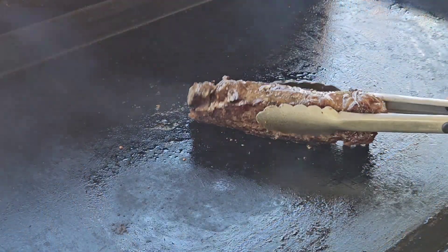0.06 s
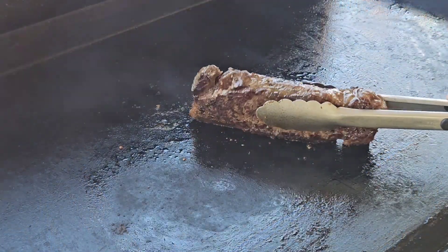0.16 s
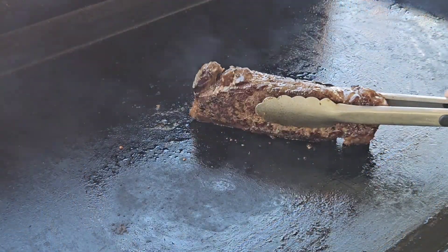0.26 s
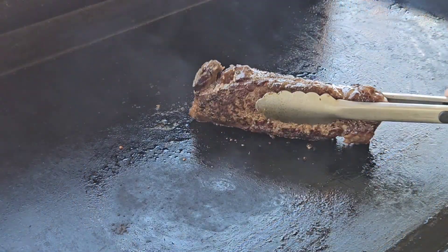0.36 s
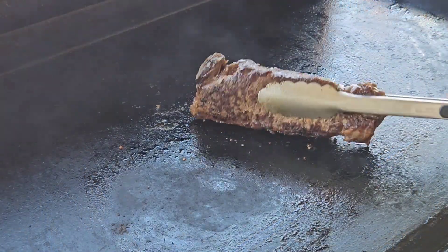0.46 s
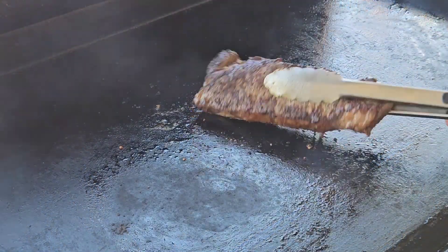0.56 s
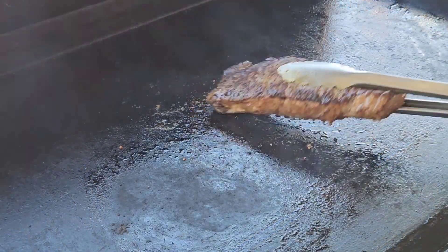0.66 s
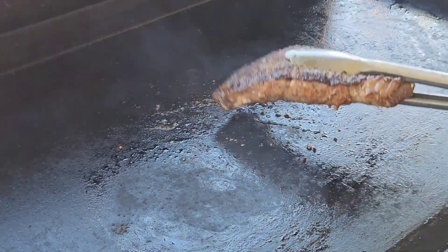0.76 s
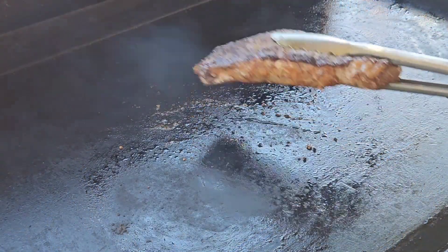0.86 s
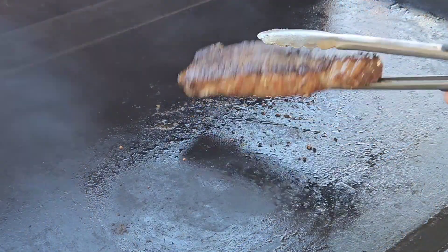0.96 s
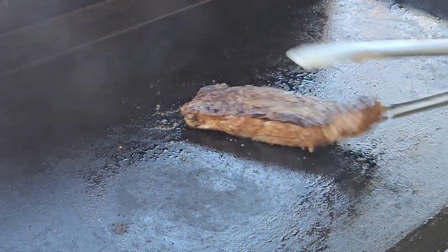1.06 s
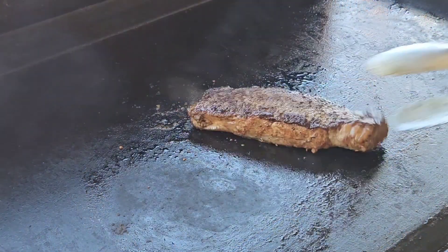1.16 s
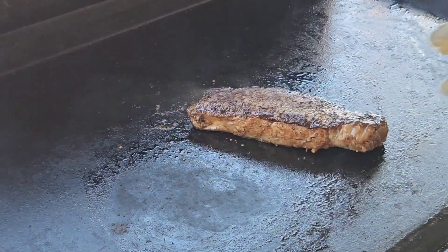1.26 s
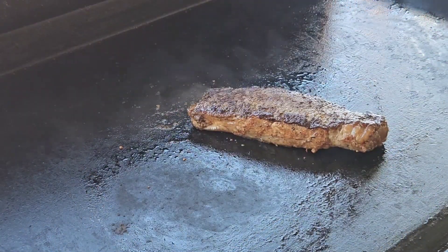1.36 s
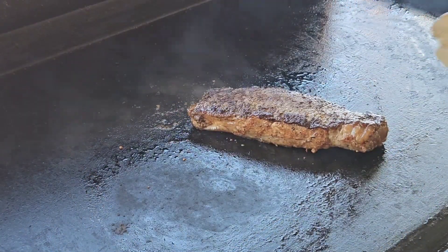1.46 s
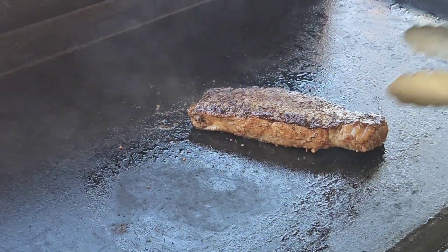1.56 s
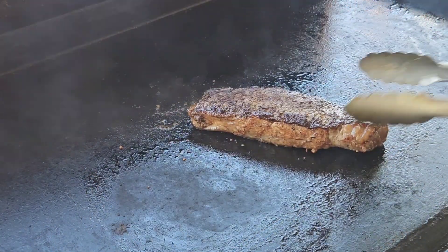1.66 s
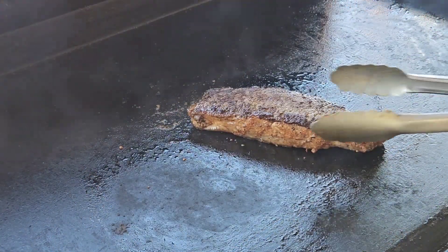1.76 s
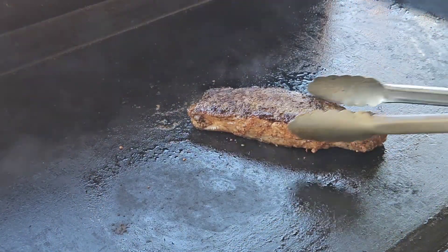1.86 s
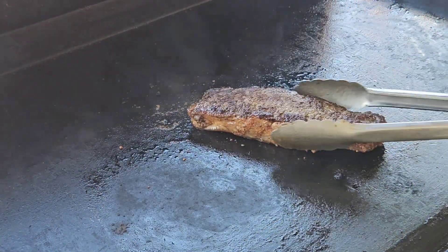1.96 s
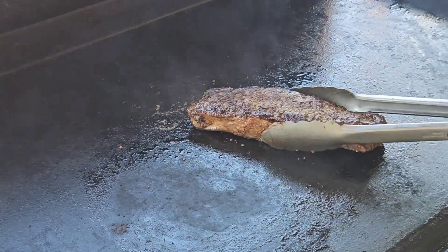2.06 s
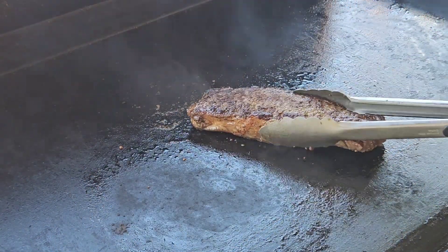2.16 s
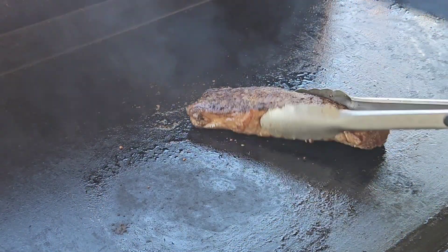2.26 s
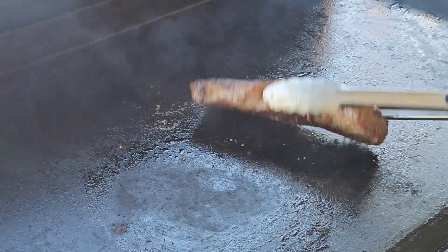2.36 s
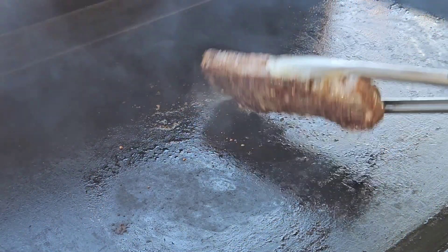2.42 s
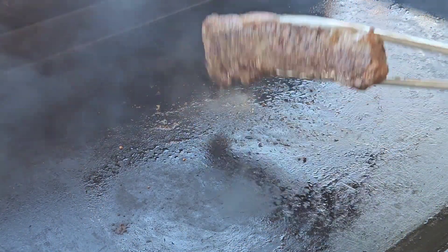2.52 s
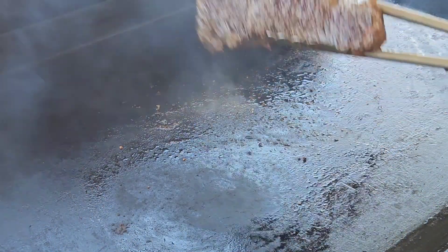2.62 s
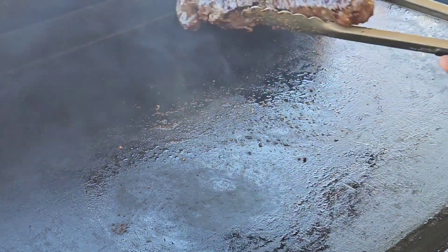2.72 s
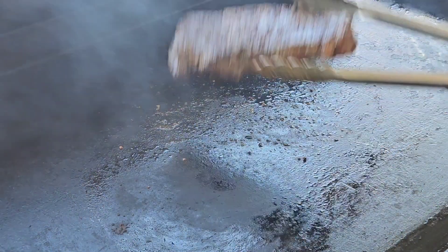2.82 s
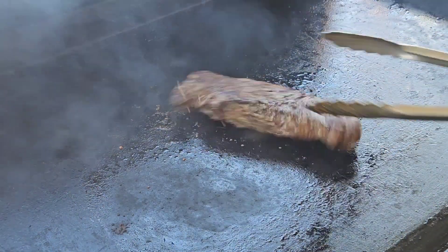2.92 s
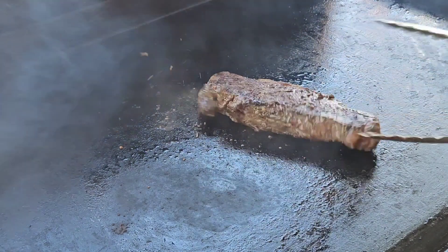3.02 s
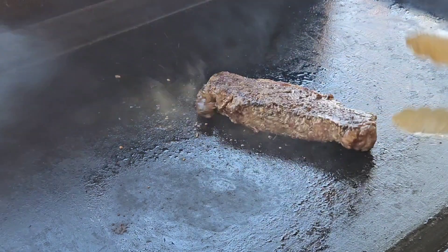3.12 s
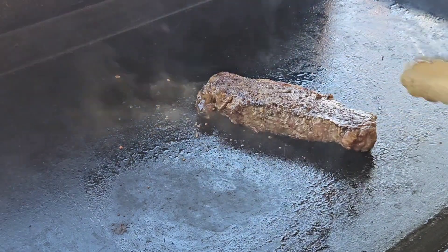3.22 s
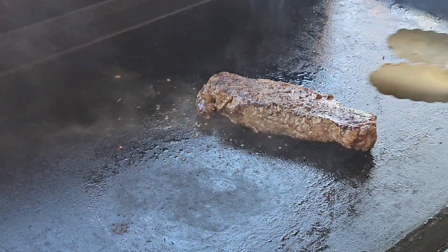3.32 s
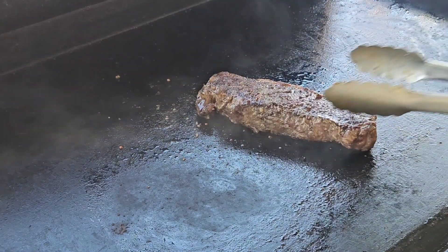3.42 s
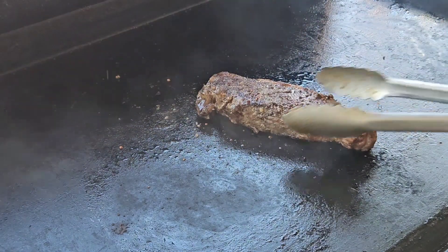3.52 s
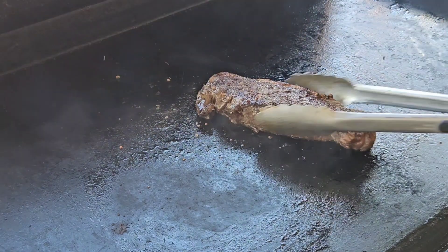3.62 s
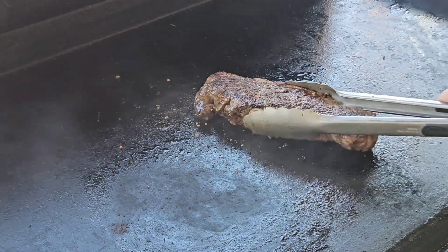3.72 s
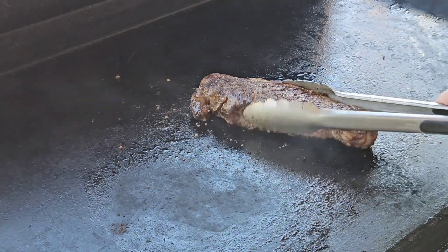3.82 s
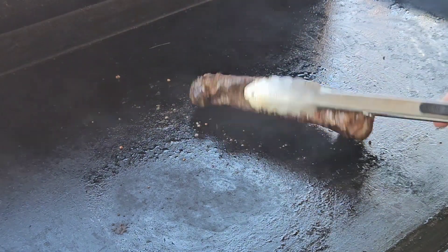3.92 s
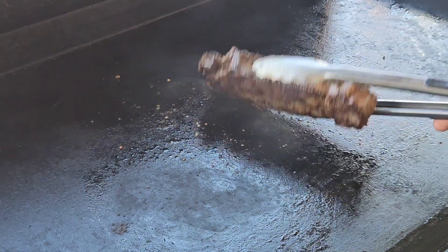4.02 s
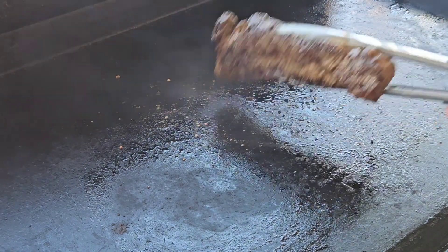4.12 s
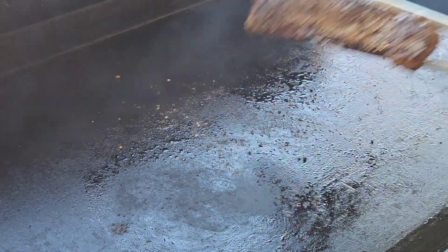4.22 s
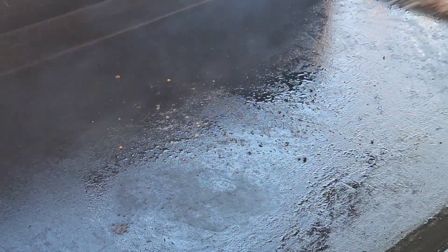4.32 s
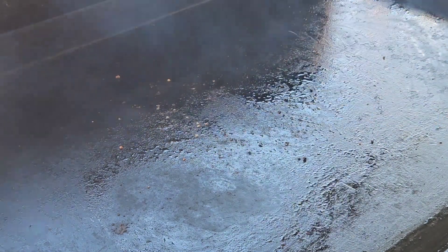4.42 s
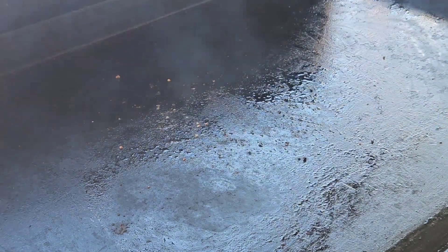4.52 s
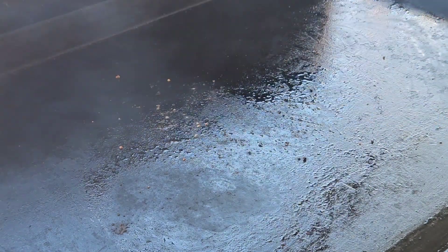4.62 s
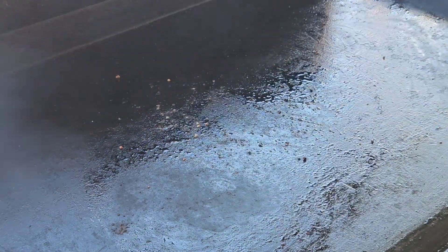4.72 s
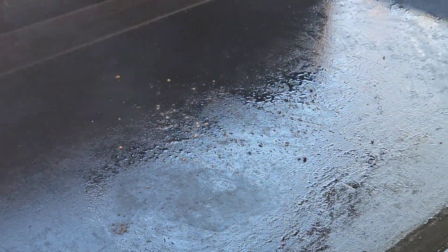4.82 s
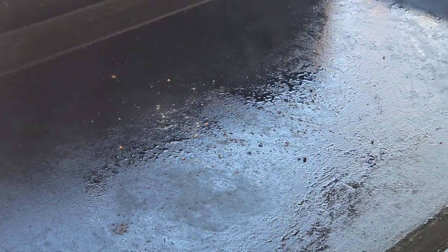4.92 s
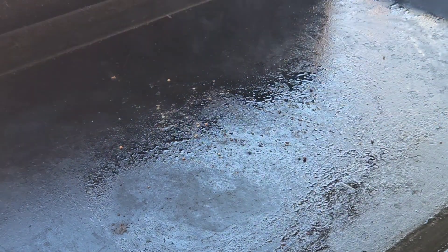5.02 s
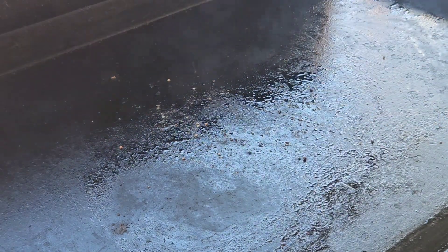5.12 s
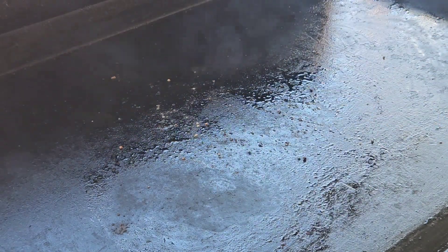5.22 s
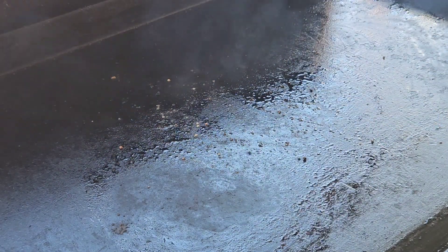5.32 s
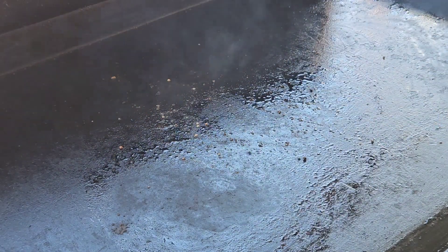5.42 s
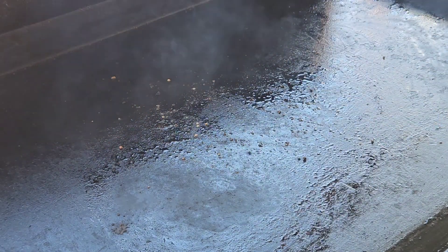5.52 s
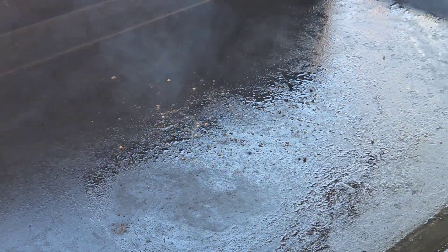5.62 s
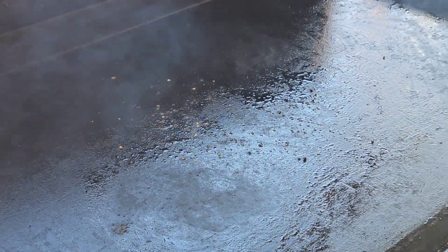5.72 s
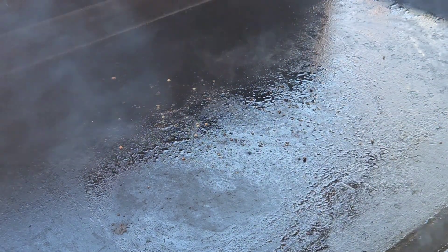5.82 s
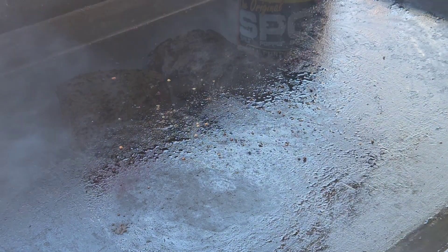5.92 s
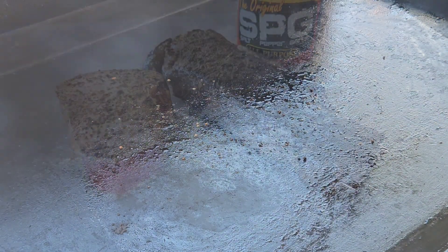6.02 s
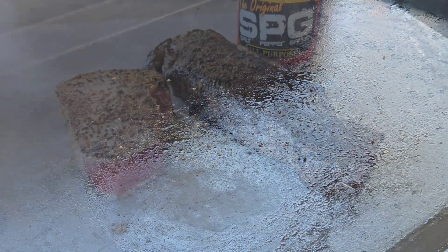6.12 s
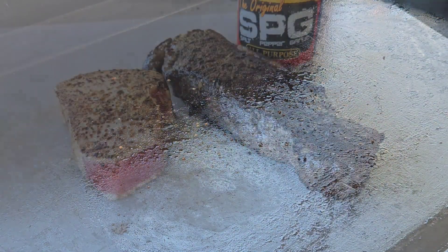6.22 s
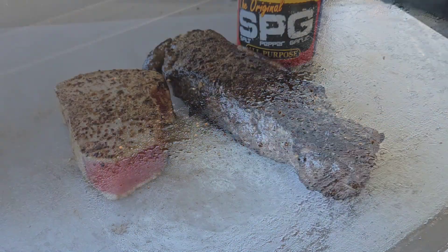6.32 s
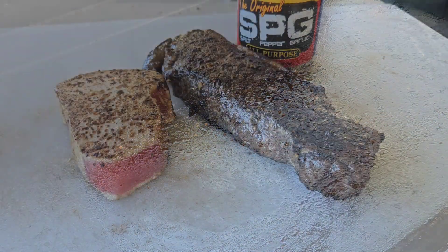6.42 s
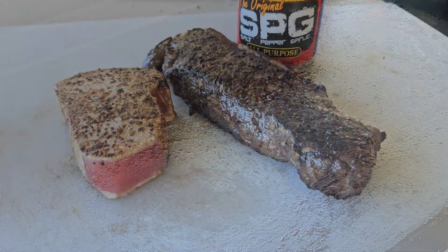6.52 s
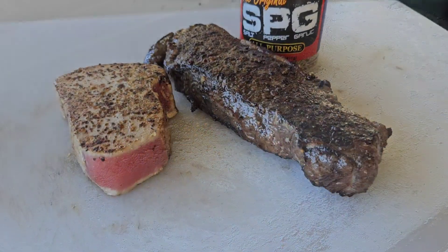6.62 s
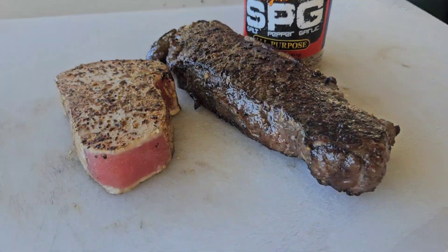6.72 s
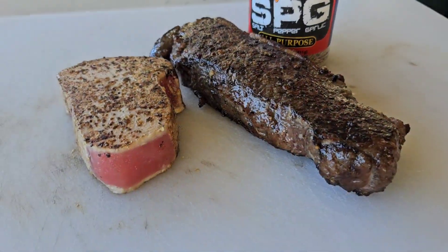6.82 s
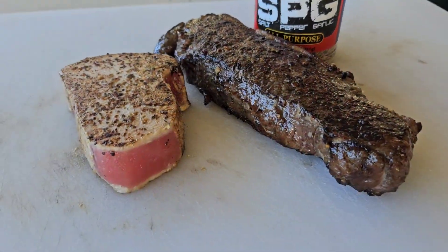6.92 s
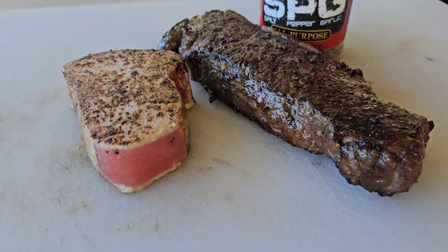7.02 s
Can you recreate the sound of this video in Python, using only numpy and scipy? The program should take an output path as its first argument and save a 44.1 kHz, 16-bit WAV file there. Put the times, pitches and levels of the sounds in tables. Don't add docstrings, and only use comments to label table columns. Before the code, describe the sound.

Outdoors, close stereo pickup of a hot griddle. From 0 to 0.6 seconds thin, bright fat sizzle carries a cluster of sharp pops, over a steady low engine drone in the distance. The sizzle dips near 0.8 with a dull tick, then a soft thud at 1.15 brings a strong rush of frying and a loud snap at 1.3. Tongs strike the steel in a quick ringing double clank at 2.1. Sizzle surges, drops around 2.5, then a lighter clank at 2.95 leads to the fiercest hiss near 3.2 with a very loud pop. More bursts and snaps follow until 4.4. The bare fat then fades to sparse spitting while the hum and a faint whine remain. At 6.41 everything stops for under a tenth of a second; then quiet air, a faint rustle at 6.75, and lumpy low wind from 6.8 to the end.

```python
import sys
import numpy as np
from scipy import signal
from scipy.fft import irfft, next_fast_len
from scipy.io import wavfile
from scipy.ndimage import uniform_filter1d

SR = 44100
rng = np.random.default_rng(int(sys.argv[2]) if len(sys.argv) > 2 else 0)


def unload_audio(sound):
    columns = np.transpose(np.atleast_2d(sound))
    steps = np.round(np.clip(columns, -1, 1) * 32767)
    wavfile.write(sys.argv[1], SR, steps.astype(np.int16))


def volts_from_db(level):
    exponent = np.asarray(level, float) / 20
    return 10 ** exponent


N = 311598
GRIDDLE_END_S, TABLE_START_S = 6.411, 6.4865
FILM_SIZE_DB = -5
LEFT_RIGHT = np.array([[1], [-1]])


def evened(x):
    return x / np.sqrt(np.mean(x ** 2) + 1e-20)


def read(points, hz):
    f, value = np.transpose(points)
    return np.interp(np.log(hz + 1), np.log(f + 1), value)


def curves(rows, t):
    s, *columns = np.transpose(rows)
    return [np.interp(t, s, c) for c in columns]


def drift(per_s):
    low_pass = signal.butter(2, per_s, fs=SR, output="sos")
    wander = signal.sosfilt(low_pass, rng.standard_normal(N + SR))
    return evened(wander[SR:])


def shaped(x, field_db, size):
    hz, t, z = signal.stft(x, SR, nperseg=size, noverlap=size * 3 // 4)
    z = z * volts_from_db(field_db(hz[:, None], t))
    return signal.istft(z, SR, nperseg=size, noverlap=size * 3 // 4)[1][..., :N]


def port_noise():
    # (frequency [Hz], likeness [-1 to 1])
    likeness = [(30, 0.75), (150, 0.73), (380, 0.68), (950, 0.31), (2380, 0.79), (5980, 0.28),
                (15000, -0.12)]
    # (frequency [Hz], left over right [dB])
    balance = [(60, -1.5), (180, 1.5), (550, -0.5), (1650, -0.5), (4970, 0.5), (15000, -1.5)]
    size = next_fast_len(N)
    hz = np.fft.rfftfreq(size, 1 / SR)
    a, b, c, d = rng.standard_normal((len(hz), 4)).T * np.sqrt(size / 2)
    same = np.clip(read(likeness, hz), 0, 1)
    lean = volts_from_db(read(balance, hz) / 2)
    left = a + 1j * b
    right = same * left + np.sqrt(1 - same ** 2) * (c + 1j * d)
    return irfft([left * lean, right / lean], size)[:, :N]


def engine():
    # (time [s], firing rate [Hz], second overtone level [dB], sixth overtone level [dB])
    running = [(0, 36.0, -34, -43), (2.6, 36.1, -34.5, -45), (4.4, 36.2, -34, -48), (5.3, 36.3, -33.5, -51),
               (6.41, 36.6, -33.5, -53)]
    # (multiple of firing rate [1], level [dB])
    exhaust = [(1, -14), (2, 0), (3, -8), (4, -16.5), (5, -1), (6, -3.5), (7, -18), (8, -17), (9, -22.5)]
    # (time [s], pitch [Hz], level [dB])
    whine = [(0, 415, -67), (4.1, 418, -65), (4.45, 423.5, -53), (6, 424, -53.5), (6.41, 424, -56)]
    # (frequency [Hz], level [dB per Hz])
    yard_colour = [(15, -36.5), (24, -8), (36, -2), (50, -7), (75, -10), (150, -9.5), (200, -18.5),
                   (300, -22.5), (420, -22.5), (635, -27.5), (1240, -30.5), (2870, -37.5), (4000, -53.5),
                   (5200, -64)]
    t = np.arange(N) / SR
    hz, low_db, high_db = curves(running, t)
    turns = np.cumsum(hz * (1 + .008 * drift(12))) / SR
    bright_db = high_db - low_db - exhaust[5][1]
    out = np.zeros(N)
    for k, db in exhaust:
        waver_db = (.3 + .3 * k) * drift(12)
        lag = 0.85 * k + .12 * k ** 2
        level_db = db + low_db + bright_db * np.clip((k - 3) / 3, 0, 1) + waver_db
        out -= volts_from_db(level_db) * np.cos(2 * np.pi * k * turns - lag)
    whine_hz, whine_db = curves(whine, t)
    whine_level = volts_from_db(whine_db + 0.63 * drift(15.0))
    whine_turns = np.cumsum(whine_hz * (1 + 0.0022 * drift(13.0))) / SR
    out += whine_level * np.sin(2 * np.pi * whine_turns)
    throb = 1 + 0.12 * np.cos(2 * np.pi * turns)
    roar = shaped(port_noise(), lambda f, s: read(yard_colour, f) + 0 * s, size=2048)
    hum = np.sqrt(2) * out * volts_from_db(0.1 * LEFT_RIGHT)
    return hum + volts_from_db(-31.5 - 5.5) * throb * evened(roar)


def table(t):
    # (frequency [Hz], level [dB per Hz])
    air_colour = [(24, -18), (40, -1), (254, -6.5), (498, -20.5), (593, -19.5), (1080, -20), (1530, -24),
                  (2070, -21.5), (3000, -33), (4150, -34), (8360, -44), (9470, -53), (15600, -47.5)]
    # (time [s], level [dB], decay [s])
    rustles = [
        (6.757, -60, 0.028),
        (7.055, -67, .02),
    ]
    # (time [s], level [dB], left over right [dB])
    breeze = [(6.49, -60, -12), (6.54, -63, 6), (6.7, -70.5, 6), (6.82, -49, 1), (6.854, -47, 1),
              (6.88, -56, 4), (6.9, -46, 6), (7.01, -46.5, 6), (7.06, -46, 5)]
    # (frequency [Hz], level [dB per Hz])
    gust = [(12, -18), (20, 2), (134, -11.5), (258, -22.5), (296, -41.5), (331, -21), (400, -58),
            (520, -76), (880, -120)]
    air = shaped(port_noise()[:, :len(t)], lambda f, s: read(air_colour, f) + 0 * s, size=1024)
    air = evened(air[:, :len(t)])
    brush = sum(volts_from_db(db) * (t > s) * np.exp(-abs(t - s) / decay) for s, db, decay in rustles)
    db, pan_db = curves(breeze, t)
    eddies = rng.standard_normal((2, len(t))) + 2.4 * rng.standard_normal(len(t))
    wind = evened(shaped(eddies, lambda f, s: read(gust, f) + 0 * s, size=4096)[:, :len(t)])
    wind = wind * volts_from_db(db + 8.5 + pan_db / 2 * LEFT_RIGHT + 1.95 * drift(30.5)[:len(t)])
    return volts_from_db(-49) * air + brush * rng.standard_normal((2, len(t))) + wind


def knocks():
    # (time [s], peak [dB], ring time factor [1], rattle [s], hardness [dB per octave])
    blows_on_steel = [
        (0.841, -30, 0.3, .008, 4),
        (1.149, -25, 1, 0.031, -24),
        (1.977, -45, 0.94, 0.0082, 16.5),
        (2.124, -14, 0.65, 0.0088, 0.5),
        (2.142, -18.5, 0.47, 0.0079, -2),
        (2.955, -28.5, 0.63, .012, 1.5),
    ]
    # (frequency [Hz], level [dB], time to fall 60 dB [s])
    steel = [(611, -8, 0.33), (699, -0.5, 0.14), (820, 0.5, 0.13), (842, -3.5, .08), (1093, -2, 0.12),
             (1214, -3.5, 0.047), (1327, -3.5, 0.12), (1519, -2.5, 0.17), (1640, -1.5, .12),
             (1741, -5, 0.041), (1902, -5, 0.12), (2470, -11, 0.12)]
    out, t = np.zeros(N + SR), np.arange(SR // 3) / SR
    chance = rng.standard_normal((len(blows_on_steel), 2, len(t)))
    clack = signal.butter(4, [660, 2600], "band", fs=SR, output="sos")
    for (s, db, ring, rattle, hard_db), (blows, yard) in zip(blows_on_steel, chance):
        modes = np.zeros(len(t))
        for hz, mode_db, t60 in steel:
            fall_db = 60 * t / (t60 * max(ring, .1))
            modes += volts_from_db(mode_db + hard_db * np.log2(hz / 1000) - fall_db) * np.sin(2 * np.pi * hz * t)
        drive = blows ** 2 * np.sign(blows) * np.exp(-t / max(rattle, .001))
        drive += 0.42 * yard * np.exp(-t / 0.085)
        drive[0] += 7.0
        ringing = evened(signal.fftconvolve(drive, modes)[:len(t)])
        sound = ringing + volts_from_db(hard_db - 7.0) * evened(signal.sosfilt(clack, drive))
        out[round(s * SR):][:len(t)] += volts_from_db(db) * sound / abs(sound).max()
    thin = signal.sosfilt(signal.butter(8, 585, "high", fs=SR, output="sos"), out[:N])
    return thin * volts_from_db(0.3 * LEFT_RIGHT)


def heat(t):
    # (time [s], level [dB])
    film_curve = [(0, -30), (.5, -28.5), (.76, -31), (1.1, -32.5), (2.56, -24.5), (2.66, -22),
                  (2.94, -25.5), (3.5, -26), (3.76, -30.5), (4.2, -24.5), (4.62, -33.5), (5.1, -33.5),
                  (5.5, -35.5), (6.41, -39)]
    # (start [s], rise [s], hold [s], level [dB], bubble size [dB])
    presses = [(.55, .05, 0.016, -27, -4.5), (0.826, 0.012, 0.018, -34, -6),
               (1.114, .045, 0.055, -23.5, -1), (1.21, 0.095, 1, -20, -2), (1.834, 0.083, 0.073, -22, -2.5),
               (2.128, 0.17, 0.18, -21.5, 1), (2.297, .15, 0.027, -19, -5), (2.954, 0.055, 0.11, -21.5, 3),
               (3.064, 0.13, 0.075, -16, -1.5), (3.278, 0.028, .1, -24.5, 2), (3.47, .03, 0.031, -33.5, 8),
               (3.564, .04, 0.095, -23.5, -4), (3.766, 0.062, .04, -25.5, 1.5),
               (3.87, 0.051, 0.066, -22.5, 1.5), (3.965, 0.043, .06, -27.5, 6),
               (4.16, 0.0071, 0.015, -26.5, -3), (4.382, 0.0068, 0.011, -30.5, 1),
               (6.387, .003, .03, -40, 3)]
    sag_db_per_s, release_db_per_s, fresh_s = 7, 82, .15
    start, rise, hold, db, size_db = np.transpose(presses)[:, :, None]
    held = t - start - rise
    fall_db = sag_db_per_s * np.clip(held, 0, hold) + release_db_per_s * np.maximum(held - hold, 0)
    press = (np.clip((t - start) / rise, 0, 1) * volts_from_db(db - fall_db)) ** 2
    film = volts_from_db(curves(film_curve, t)[0]) ** 2
    total = film + press.sum(0)
    fresh = np.exp(-abs(held) / fresh_s) * np.clip((size_db + 1.0) / 4.5, 0, 1)
    mean_size_db = (film * FILM_SIZE_DB + (press * size_db).sum(0)) / total
    return 10 * np.log10(total), mean_size_db, (press * fresh).sum(0) / total


def pops():
    # (time [s], peak [dB], low part over peak [dB], length [ms])
    loud_pops = [(0.0144, -14, -14, 0.55), (0.1002, -9, -15, 0.55), (0.1226, -9, -21, 0.55),
                 (0.1999, -13, -13, 0.55), (0.2264, -9, -21, 0.55), (0.2803, -9, -18, 0.55),
                 (0.3646, -10, -24, 0.55), (0.4813, -11, -17, 0.55), (0.4918, -10, -16, 0.55),
                 (0.5571, -10, -19, 0.55), (0.5866, -9, -19, 0.55), (0.842, -16, -13, 0.55),
                 (0.8584, -16, -11, 0.55), (0.8749, -13, -16, 0.55), (0.9542, -14, -13, 0.55),
                 (0.9772, -13, -18, 0.55), (1.043, -15, -16, 0.55), (1.3064, -4, -14, 0.55),
                 (2.4384, -2, -18, 0.55), (3.2574, -1, -17, 0.55), (3.6646, -2, -15, 0.55),
                 (4.0347, -2, -15, 0.55), (4.3146, -7, -19, 0.55), (4.7027, -17, -14, 0.55),
                 (4.9003, -12, -23, 0.55), (5.4595, -17, -17, 0.55), (5.7329, -17, -21, 0.55),
                 (6.1165, -16, -15, 0.55), (6.3589, -23, -17, 0.55), (6.3879, -21, -14, 0.55)]
    stray_count, stray_over_db, stray_spread_db = 75, 12.5, -1.5
    out, t = np.zeros((2, N + SR)), np.arange(900) / SR
    when = GRIDDLE_END_S * rng.random(stray_count)
    luck = rng.standard_normal((stray_count, 2))
    stray_db = heat(when)[0] + stray_over_db + stray_spread_db * luck[:, 0]
    strays = np.transpose([when, stray_db, -17 + 1.8 * luck[:, 1], .3 + 0 * when])
    rows = np.vstack([loud_pops, strays])
    u = t / (np.maximum(rows[:, 3:], .1) / 1000)
    shape = u * np.exp(1 - u) + .06 * np.exp(-t / .004)
    noise = rng.standard_normal((len(rows), 3, len(t))) * shape[:, None]
    noise[:, :, 6] += 3.0
    shared, own = noise[:, :1], noise[:, 1:]
    low_band = signal.butter(2, [3000, 8600], "band", fs=SR, output="sos")
    high_band = signal.butter(2, [10800, 15400], "band", fs=SR, output="sos")
    low = signal.sosfilt(low_band, 1.5 * shared + own)
    high = signal.sosfilt(high_band, 0.17 * shared + own)
    low, high = (part / abs(part.mean(1)).max(1)[:, None, None] for part in (low, high))
    pans_db = -1.3 + 0.94 * rng.standard_normal(len(rows))
    for (s, db, low_db, _), pan_db, body, top in zip(rows, pans_db, low, high):
        side = volts_from_db(db + pan_db / 2 * LEFT_RIGHT)
        at = round((s + .0009) * SR)
        out[:, at:at + len(t)] += side * (volts_from_db(low_db + 14.5) * body + volts_from_db(1.5) * top)
    return out[:, :N]


def bursts(per_s, spread_db, ms):
    busy = per_s / SR * volts_from_db(3.2 * drift(25))
    size = volts_from_db(spread_db * np.minimum(rng.exponential(1, N), 4)) * (rng.random(N) < busy)
    side = volts_from_db(3.0 * rng.standard_normal(N) * LEFT_RIGHT)
    u = np.arange(300) / (ms * SR / 1000)
    pulse = u * np.exp(-u)
    power = signal.oaconvolve((size * side) ** 2, pulse[None] ** 2, axes=1)[:, :N]
    return np.sqrt(abs(power) / power.mean())


def sizzle():
    # (frequency [Hz], level [dB per Hz])
    fizz_colour = [(350, -51.5), (600, -11), (669, -22.5), (736, -23.5), (820, -12.5), (939, -19),
                   (1530, -13), (2300, -10.5), (4790, 2.5), (8470, 2), (9710, -2.5), (12400, 6), (14600, 8),
                   (15400, -0.5)]
    flicker_db, flicker_per_s = 1.1, 16
    fresh_db = 10.5
    film_spit = .3
    flicker = drift(flicker_per_s)

    def colour(hz, t):
        level_db, size_db, fresh = heat(t)
        octave = np.log2(hz + 50)
        large = 1 / (1 + np.exp(4.2 * (octave - np.log2(9000))))
        largest = 1 / (1 + np.exp(8.4 * (octave - np.log2(3750))))
        patches = uniform_filter1d(rng.standard_normal((len(hz), len(t))), 6, 0)
        patches = evened(uniform_filter1d(patches, 30, 1))
        level_db = level_db + flicker_db * np.interp(t * SR, np.arange(N), flicker)
        largest_db = 0.26 * size_db + fresh_db * fresh - .25 * (level_db + 19) - 1.0
        return (read(fizz_colour, np.minimum(hz, 15300)) + level_db + (large - largest) * size_db
                + largest * largest_db + 0.93 * patches)

    coarse = np.arange(0, N, 200)
    bare = np.clip(heat(coarse / SR)[1] / FILM_SIZE_DB, 0, 1) ** 2
    thin = np.interp(np.arange(N), coarse, bare)
    steam = 0.7 * (1 - film_spit * thin) * port_noise()
    fizz = 0.55 * bursts(per_s=1100, spread_db=-1.5, ms=0.19) * port_noise()
    spits = 0.26 * (1 + film_spit * thin) * bursts(per_s=86, spread_db=2.0, ms=0.39) * port_noise()
    return volts_from_db(5.0) * shaped(steam + fizz + spits, colour, size=256)


def gated(x):
    # (centre [Hz], width [Hz], extra readiness [dB])
    dropouts = [(3650, 550, 2.0), (5800, 1800, 1.5), (9900, 500, .8)]
    hz, t, z = signal.stft(x, SR, nperseg=1024, noverlap=768)
    power = uniform_filter1d((abs(z) ** 2).mean(0), size=5, axis=1) + 1e-20
    around = uniform_filter1d(power, size=40, axis=0)
    dip_db = 10 * np.log10(uniform_filter1d(power, size=5, axis=0) / around)
    treble_db = 10 * np.log10(power[(hz > 11500) & (hz < 15000)].mean(0))
    masked = .12 * np.clip(treble_db - 10 * np.log10(around) - 8, -8, 8)
    awake = treble_db > -75
    quiet = .18 * np.clip(-48 - treble_db, 0, 12) * (hz[:, None] < 11000) * awake
    valleys = sum(size * np.exp(-((hz[:, None] - f) / width) ** 2) for f, width, size in dropouts)
    shut = (dip_db < -3.9 + valleys + masked + quiet) & (hz[:, None] > 2700) & awake
    shut = shut[np.arange(len(hz)) // 5 * 5][:, np.arange(len(t)) // 4 * 4]
    return signal.istft(z * volts_from_db(-40 * shut), SR, nperseg=1024, noverlap=768)[1][:, :N]


def scene():
    t = np.arange(N) / SR
    griddle = sizzle() + pops() + knocks() + engine()
    out = griddle * np.clip((GRIDDLE_END_S - t) / 0.00085, 0, 1)
    late = t > TABLE_START_S
    out[:, late] += table(t[late]) * np.minimum((t[late] - TABLE_START_S) / 0.00032, 1)
    return out


def roll_off(x):
    return signal.sosfilt(signal.butter(12, 16480, fs=SR, output="sos"), x)


def record(dry):
    t = np.arange(N) / SR
    limited = np.tanh(dry / .85) * .85
    joined = gated(limited) * ((t < GRIDDLE_END_S) | (t > TABLE_START_S))
    low_pass = signal.firwin(1601, 15560, window=("kaiser", 9), fs=SR)
    banded = signal.oaconvolve(joined, low_pass[None], "same")
    return roll_off(banded)


dry = scene()
out = record(dry)
unload_audio(out)
```